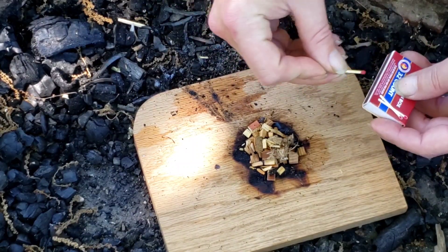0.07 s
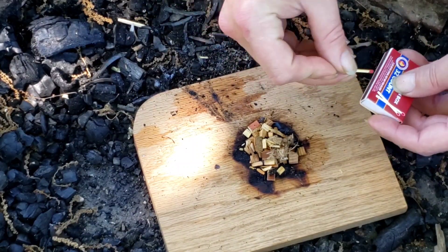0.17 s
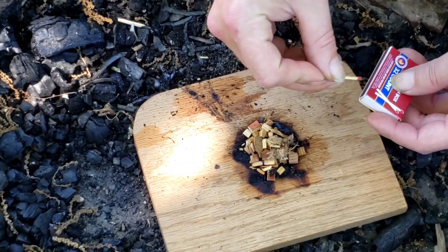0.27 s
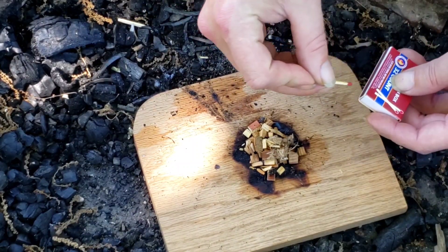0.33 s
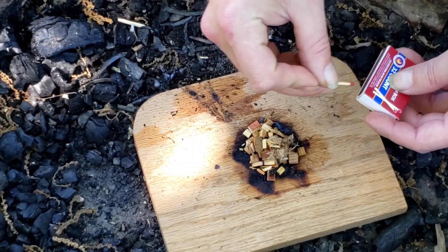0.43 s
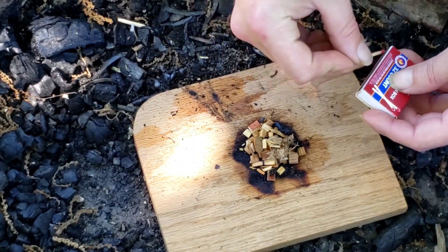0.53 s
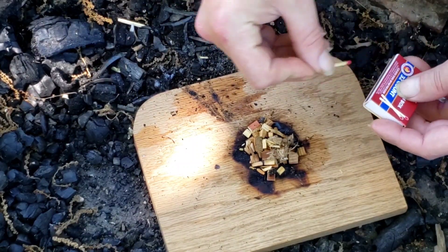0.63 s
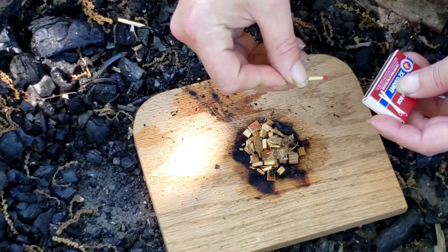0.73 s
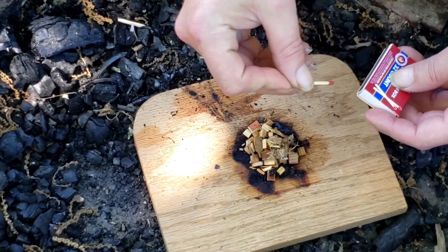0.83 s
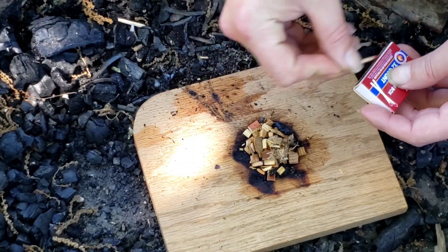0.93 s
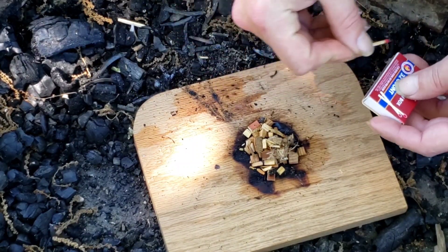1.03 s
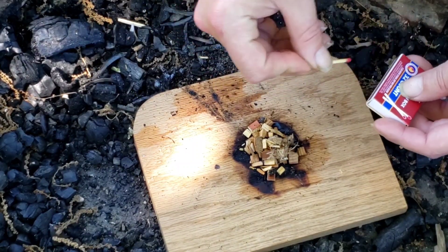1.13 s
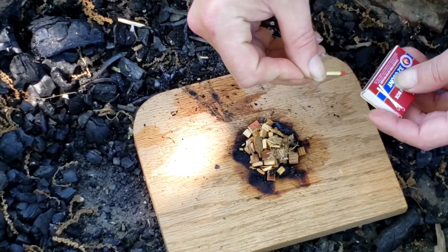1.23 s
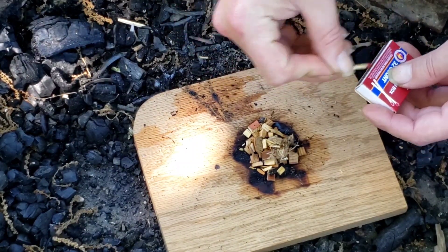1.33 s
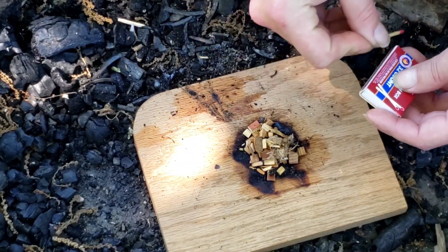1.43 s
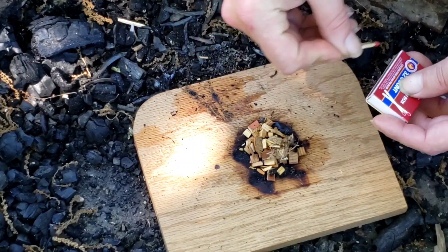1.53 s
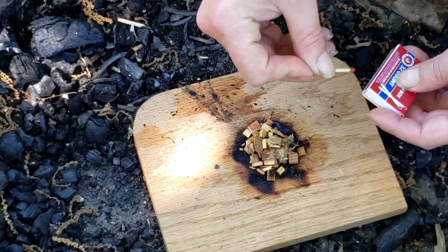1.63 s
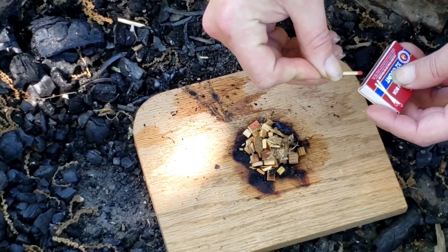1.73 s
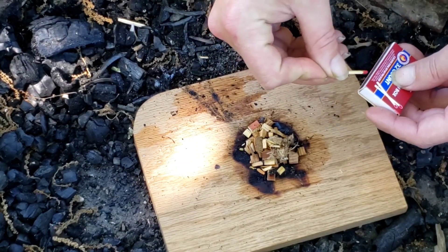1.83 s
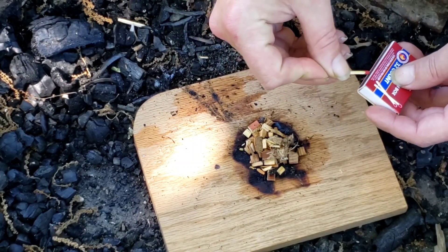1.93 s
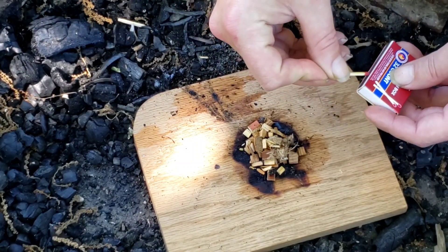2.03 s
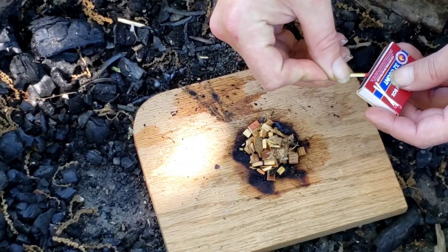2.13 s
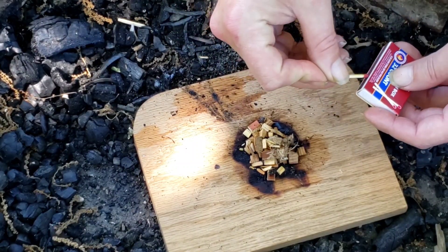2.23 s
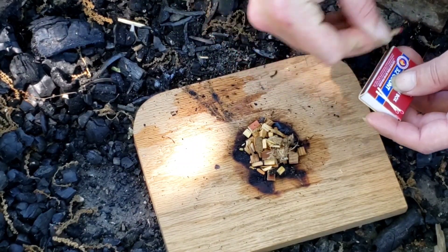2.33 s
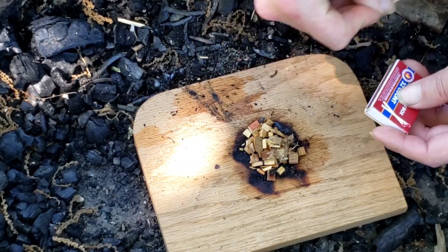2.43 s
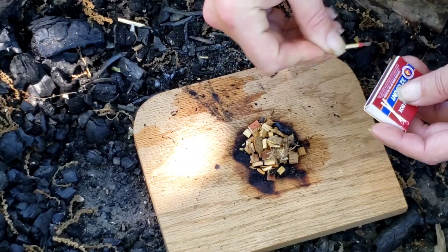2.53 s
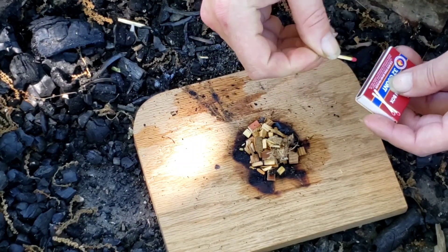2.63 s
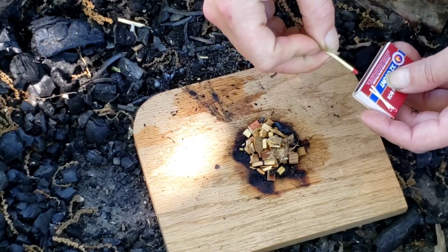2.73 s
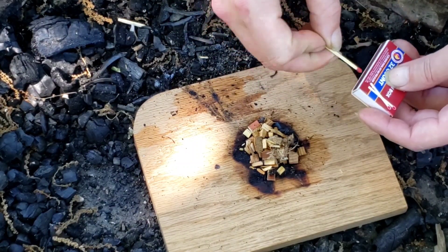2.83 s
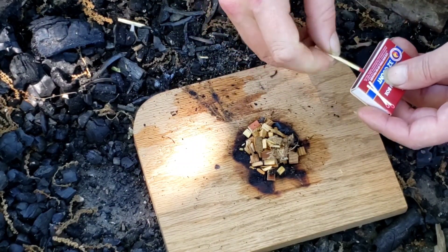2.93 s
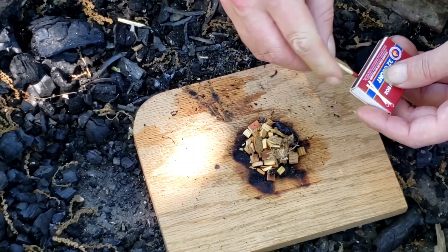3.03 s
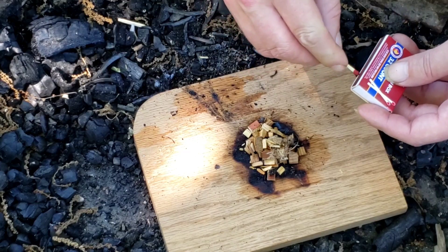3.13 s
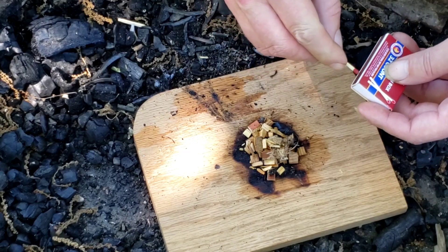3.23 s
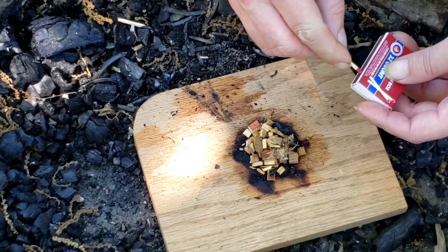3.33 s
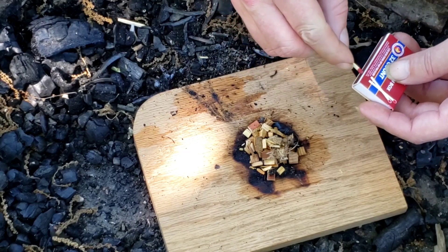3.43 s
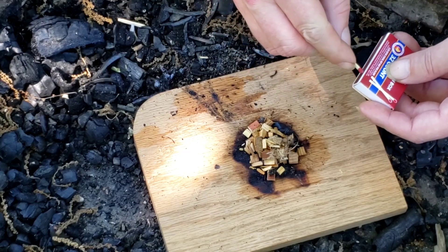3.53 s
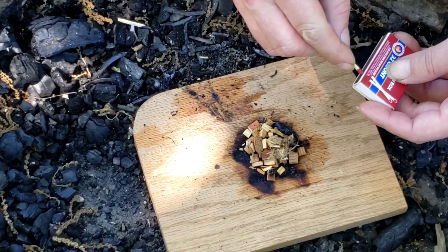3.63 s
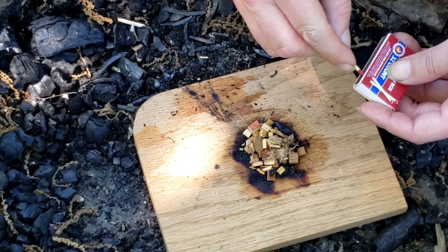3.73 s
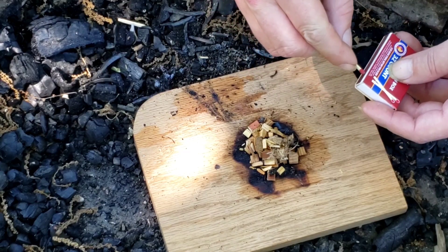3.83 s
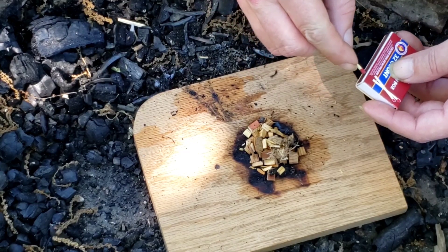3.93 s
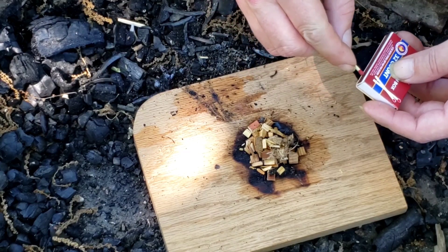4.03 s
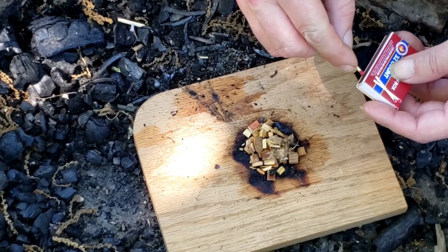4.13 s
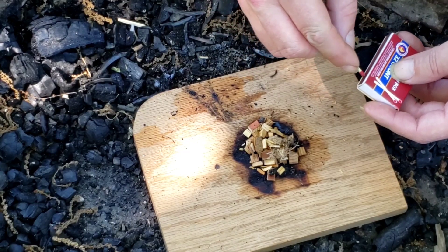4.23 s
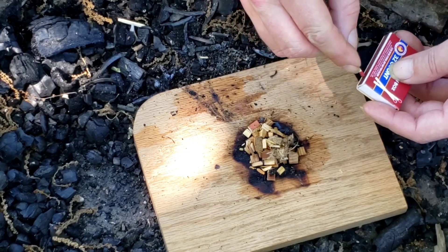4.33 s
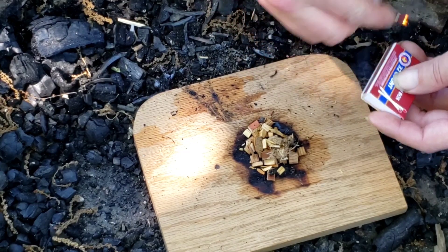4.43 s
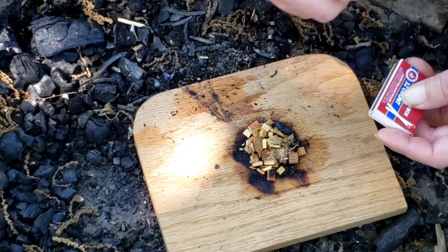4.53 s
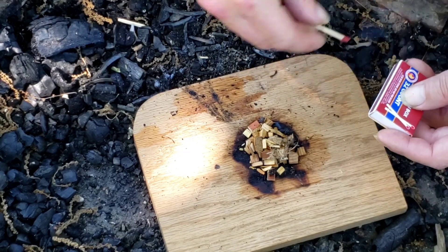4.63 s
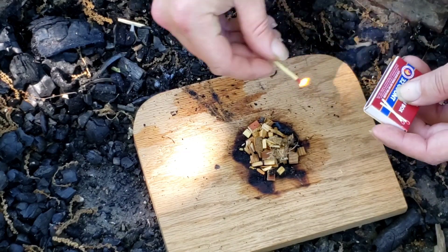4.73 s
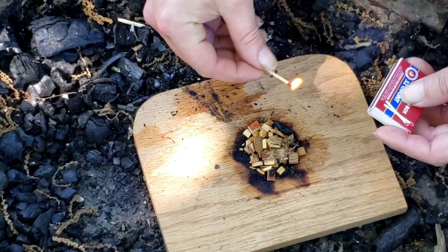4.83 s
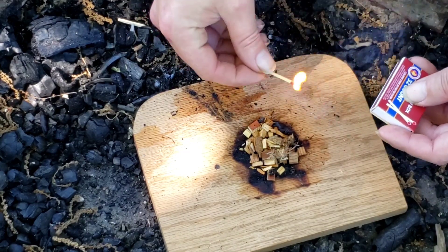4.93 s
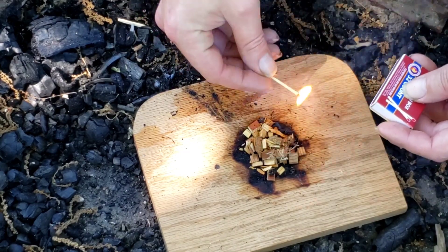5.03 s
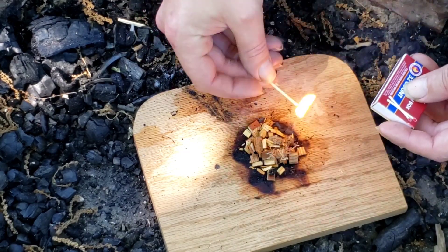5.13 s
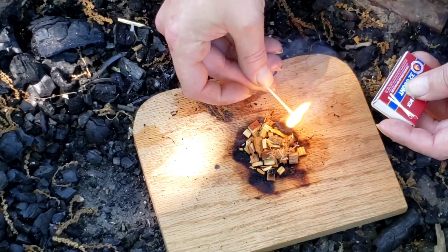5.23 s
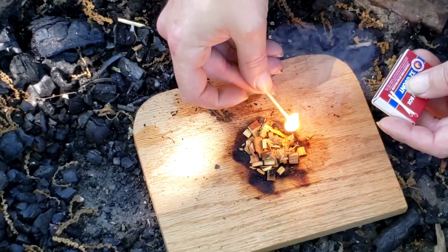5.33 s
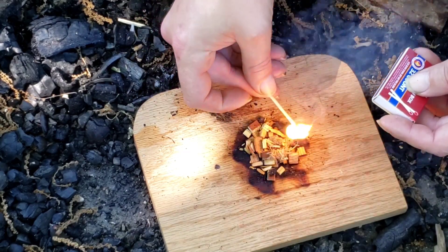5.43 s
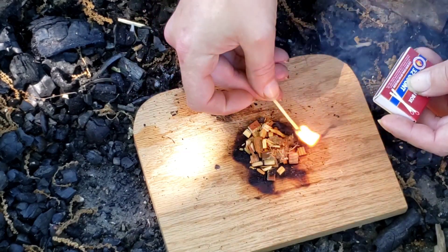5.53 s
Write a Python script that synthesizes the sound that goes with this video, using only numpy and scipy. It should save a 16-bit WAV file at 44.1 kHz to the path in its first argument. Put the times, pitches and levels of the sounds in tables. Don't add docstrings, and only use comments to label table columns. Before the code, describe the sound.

Four light scratchy match drags on a cardboard box, then one hard rasping strike and a thin fizzing flare, with birds and a distant engine idle.

```python
import sys
import numpy as np
from scipy import signal
from scipy.fft import rfft, irfft, next_fast_len
from scipy.io import wavfile
from scipy.ndimage import uniform_filter1d, map_coordinates

SR = 44100
rng = np.random.default_rng(int(sys.argv[2]) if len(sys.argv) > 2 else 0)


def level_to_linear(level):
    exponent = np.asarray(level, float) / 20
    return 10 ** exponent


def pcm_store(signal):
    levels = np.round(np.clip(np.atleast_2d(signal), -1, 1) * 32767)
    wavfile.write(sys.argv[1], SR, levels.astype(np.int16).T)


N = 245985
T = np.arange(N) / SR
SIDES = np.array([[.5], [-.5]])

# (head touches [s], rests [s], drags [s], pressure as the drag starts [dB], as it ends [dB])
STROKES = [
    (0.577, 0.001, 0.068, -39, -47),
    (1.024, 0.002, 0.043, -39.5, -40),
    (1.4437, 0.0016, 0.046, -40.5, -40),
    (2.378, 0.011, 0.036, -39.5, -39),
    (4.487, 0.0048, 0.029, -29.5, -31),
]
# (treble tilt [dB/octave], left board echo [ms], right [ms], echo share [ratio],
# left minus right [dB])
POSES = [(1, 0.448, 0.438, 0.29, .5), (1, 0.455, 0.433, 0.38, 0.5), (3, 0.418, 0.403, 0.38, 0),
         (0.5, 0.474, 0.5, 0.23, 0.5), (0, 0.223, 0.295, 0.21, -0.5)]
# (time [s], peak [dB])
SLIPS = [(0.5819, -58), (0.5912, -36.5), (0.5969, -29.5), (1.034, -49), (1.0492, -45), (1.4704, -39),
         (2.3931, -48), (2.407, -38), (2.4222, -32), (2.4249, -30), (4.49, -36), (4.4963, -16),
         (4.4983, -21), (4.5012, -18.5), (4.5045, -22), (4.5071, -19), (4.5143, -21), (4.5199, -19.5),
         (4.5335, -34)]
# (frequency [Hz], density [dB per Hz])
LIGHT_COLOUR = [(400.0, -16.5), (600.0, -22.5), (1100.0, -6), (1400.0, -4), (2000.0, -1.5), (2900.0, -1.5),
                (4300.0, -4), (5800.0, -11), (7500.0, -5), (9200.0, -14.5), (10500.0, -9), (12000.0, 0.5),
                (14500.0, -4), (15700.0, -4.5)]
# (frequency [Hz], density [dB per Hz])
HARD_COLOUR = [(150.0, -13), (350.0, -10.5), (600.0, -17), (900.0, -8.5), (1300.0, -9.5), (1800.0, -1),
               (2600.0, -6.5), (4000.0, -8), (6000.0, -11), (7500.0, -10), (9000.0, -16), (10500.0, -11),
               (12500.0, 1.5), (15500.0, -7.5)]
# (frequency [Hz], width [Hz])
BOX_MODES = [(800, 125), (1800, 190), (2300, 113), (3750, 350), (5000, 1050), (8200, 470)]
GRIP = [(7, 1, 10, 7.5, 7, -6), (-19, 4, 9.5, 10.5, 8.5, -7), (7, 10, 6.3, 13, 10, 2),
        (1, 12, 3.8, 0, 3, -22)]
# (time [s], length [s], level [dB], treble tilt [dB/octave])
BRUSHES = [
    (0.745, 0.02, -69, -5),
    (2.816, .06, -76, 9),
    (2.968, 0.096, -79.5, -3),
    (3.002, .01, -79, -4),
    (3.038, 0.042, -67.5, -2),
    (3.684, 0.011, -92, 6),
    (4.782, 0.016, -61, -9),
]
# (time [s], peak [dB])
KNOCKS = [
    (2.379, -50.5),
    (2.385, -47),
]
# (frequency [Hz], density [dB per Hz])
FLARE_COLOUR = [(300, -3.5), (600, -14), (1200, -24.5), (2000, -29), (3000, -23.5), (5000, -14),
                (7000, -17.5), (8300, -8), (9200, -27), (10500, -23.5), (12400, -1.5), (14000, -17),
                (15700, -15)]
# (time [s], peak [dB])
SPITS = [(5.0494, -74), (5.1094, -68), (5.1612, -52), (5.1654, -58), (5.1961, -47), (5.2335, -50),
         (5.2944, -60), (5.3023, -60), (5.3023, -49), (5.3258, -53), (5.3514, -57), (5.3564, -53),
         (5.3936, -36.5), (5.4054, -49), (5.4884, -64), (5.4994, -60), (5.523, -47.5), (5.5518, -55),
         (5.5574, -76)]
# (time [s], lag [ms])
FLAME_HEIGHT = [(4.55, .33), (4.68, .31), (4.86, 0.27), (5.1, 0.29), (5.35, 0.265), (5.45, 0.299),
                (5.58, .29)]
# (frequency [Hz], density [dB per Hz])
LENS_COLOUR = [(350, -15.5), (600, -10.5), (927, -25), (990, -9), (1070, -11), (1920, 1), (2560, -5.5),
               (2940, -20.5), (3400, -19), (4420, -26), (7480, -120)]
# (time [s], length [s], start [Hz], end [Hz], level [dB])
WHISTLER = [(0.008, 0.027, 4080, 4100, -60.5), (.046, .018, 4130, 3990, -61.5),
            (.075, 0.024, 4050, 4000, -68), (.21, .04, 3790, 3430, -75), (.365, .03, 3350, 3700, -71),
            (.465, 0.047, 3630, 3810, -67), (.515, .06, 3700, 3905, -67.5),
            (.655, 0.078, 3945, 3917, -57.5), (.742, .045, 3940, 3955, -70)]
# (time [s], length [s], start [Hz], end [Hz], level [dB])
WARBLER = [(.046, .018, 4050, 3600, -61.5), (.09, 0.048, 3480, 4350, -67), (.14, .05, 4450, 4650, -72.5),
           (.32, 0.022, 3190, 2970, -77), (.393, 0.034, 3900, 2530, -64.5), (.43, .012, 2540, 3000, -68),
           (.442, 0.037, 3000, 2680, -58.5), (1.11, .012, 3500, 3150, -65), (1.122, 0.023, 3150, 2250, -62),
           (1.14, 0.044, 2213, 2120, -69.5), (1.18, .012, 2180, 2750, -66),
           (1.192, .033, 2810, 2686, -58.5), (1.225, .012, 2755, 3400, -61.5),
           (2.22, 0.076, 2580, 3480, -75), (2.29, .012, 3380, 2980, -70), (2.302, .063, 2990, 2210, -70),
           (2.43, .04, 2450, 2600, -68), (2.47, .03, 2597, 3380, -67.5), (2.5, .025, 3350, 3380, -76),
           (5.1, .12, 2470, 2625, -75.5), (5.22, 0.045, 2660, 2600, -72.5), (5.27, .02, 2600, 2320, -68),
           (5.52, .07, 2300, 2520, -71.5)]
# (time [s], length [s], start [Hz], end [Hz], level [dB])
PEEPS = [(.05, 0.22, 4000, 4180, -70), (.36, 0.084, 3600, 4570, -74), (0.75, 0.16, 6700, 6560, -77),
         (0.932, 0.049, 6300, 4900, -77), (1.15, 0.16, 7430, 7600, -77), (1.308, 0.16, 8650, 8600, -78),
         (1.993, 0.093, 6880, 6770, -72), (1.997, 0.095, 5900, 6000, -73), (3.04, .06, 2310, 2360, -73)]
# (multiple of the firing rate [1], level [dB])
IDLE = [(1, -34), (2, 0.5), (3, -16.5), (4, -10.5), (5, -3), (6, -13), (7, -12), (8, -23), (9, -22.5),
        (10, -19), (11, -25), (12, -33.5)]
# (frequency [Hz], width [Hz], level [dB])
DRONES = [(97.86, 7.4, -61.5), (88.96, 6.8, -66.5), (111.6, 3.8, -68.5)]
# (frequency [Hz], density [dB per Hz])
AIR_COLOUR = [(12, -25), (20, -15), (54, 6), (107, -8), (162, -8), (240, -13.5), (295, -16.5), (356, -22),
              (510, -31.5), (1200, -38.5), (1560, -78.5), (2640, -120)]
# (time [s], depth [dB])
LULLS = [(.23, -8), (.6, -3), (1.98, -6), (2.79, -7), (3.04, -6), (3.65, -3), (4.12, -5)]
# (frequency [Hz], density [dB per Hz])
HISS_LEFT = [(400, -5.5), (700, -11.5), (1400, -6), (2100, -12.5), (2550, -5), (2950, -16), (3900, -6),
             (4500, -13), (5500, -22), (7500, -25.5), (8800, -31), (11000, -20.5), (14000, -25.5),
             (15700, -13)]
# (frequency [Hz], density [dB per Hz])
HISS_RIGHT = [(400, -3.5), (700, -14.5), (1500, -14.5), (3000, -16.5), (5000, -22), (7500, -25),
              (8800, -23), (11000, -21.5), (14000, -14.5), (15700, -25)]
# (frequency [Hz], left minus right [dB], left leads [rad])
PORTS = [
    [(400.0, 2.7, -0.9), (600.0, 2.0, -0.9), (1100.0, 2.7, -0.8), (1400.0, 3.6, -0.7), (2000.0, 3.3, -1.6),
     (2900.0, -1.0, -1.3), (4300.0, -0.5, -1.9), (5800.0, -1.6, -2.2), (7500.0, -3.1, -1.7),
     (9200.0, -0.6, -2.1), (10500.0, -0.3, -2.0), (12000.0, -2.5, -2.3), (14500.0, -0.7, -2.2),
     (15700.0, -1.3, -2.2)],
    [(150.0, 3.9, -0.5), (350.0, 1.5, -0.2), (600.0, 2.8, -0.1), (900.0, 5.1, -0.1), (1300.0, 3.8, -0.2),
     (1800.0, 7.5, -1.0), (2600.0, 9.0, -1.7), (4000.0, -5.4, -1.9), (6000.0, -11.5, -1.9),
     (7500.0, -7.6, -1.8), (9000.0, -1.1, -2.2), (10500.0, -5.7, -2.0), (12500.0, -8.4, -2.3),
     (15500.0, 1.0, -2.4)],
]

BITE_S, REST_DB = .002, -13
LIFT_S, LIFT_DB, JUDDER_DB = .012, -16.5, 0.84
SINK_PER_S = 2
KNOCK_HZ, KNOCK_WIDTH_HZ = 960, 370
IGNITES_S, CATCH_S, SPARK_DB, BLAZE_DB = 4.58, 0.25, -70.5, -64
GROUND_LAG, SWAY_MS, SWAY_PER_S = 4.3, .15, 4
LENS_S, LENS_KICK_S, LENS_RUN_S = 4.275, 0.034, 0.14
LENS_KICK_DB, LENS_DB = -67.5, -65
SLUR_EDGE_S, WHISTLER_PAN_DB, WARBLER_PAN_DB = 0.0056, 0.5, 2.5
FLUTTER_DB, WAVER = 2.5, .007
BUZZ = 0.14
TREES_T60_S, TREES_DB = .3, -9
IDLE_HZ = 28.48
LULL_S, NEARING_DB_S = .045, .3


def strokes():
    out, rub = np.zeros((2, N)), grit(0.99, 2.8)
    cracks = bursts(SLIPS, 0.0015) * level_to_linear(-2.3) * np.sign(rub)
    judder = level_to_linear(JUDDER_DB * walk(120))
    for k, (stroke, pose) in enumerate(zip(STROKES, POSES)):
        tilt_db, left_ms, right_ms, share, pan_db = pose
        i = slice(int((stroke[0] - .02) * SR), int((stroke[0] + .13) * SR))
        shake = (rub * judder * pressure(*stroke))[i]
        crack = cracks[i]
        hard = k == len(GRIP)
        if hard:
            heard = colour(shake + crack, HARD_COLOUR, tilt_db=tilt_db)
        else:
            drive = shake + 0.47 * crack
            body = sum(level_to_linear(db) * ring(drive, *mode) for mode, db in zip(BOX_MODES, GRIP[k]))
            heard = colour(0.63 * shake + 0.63 * crack + body, LIGHT_COLOUR, tilt_db=tilt_db)
        at = np.arange(len(shake))
        sink = 1 - SINK_PER_S * (T[i] - stroke[0] - stroke[2] / 2)
        pair = [direct + share * map_coordinates(direct, [at - ms * sink * SR / 1000])
                for direct, ms in zip(heard, (left_ms, right_ms))]
        ports = turn(np.array(pair), PORTS[int(hard)]) * level_to_linear(SIDES * pan_db)
        out[:, i] += ports * np.std(shake + crack) / np.std(ports)
    return echoes(out, 0.32, -21, 0.0035)


def pressure(s, rest, drag, start_db, end_db):
    times = s + np.cumsum([0, BITE_S, rest, BITE_S, drag, LIFT_S, LIFT_S]) - BITE_S
    touch_db = [start_db + 4 * REST_DB, start_db + REST_DB, start_db + REST_DB]
    lift_db = [end_db + LIFT_DB, end_db + 4 * LIFT_DB]
    return curve(np.transpose([times, touch_db + [start_db, end_db] + lift_db]))


def grit(spread_db, patch_db):
    size_db = spread_db * rng.exponential(size=N) + patch_db * walk(500)
    return level(rng.standard_normal(N) * level_to_linear(size_db), 0)


def flare():
    board_ms = np.interp(T, *np.transpose(FLAME_HEIGHT))
    ground_ms = GROUND_LAG * board_ms + SWAY_MS * walk(SWAY_PER_S)
    blaze = curve([(IGNITES_S, SPARK_DB), (IGNITES_S + CATCH_S, BLAZE_DB), (N / SR, BLAZE_DB)])
    flutter = level_to_linear(0.5 * walk(21.0))
    jet = level(colour(grit(1.35, 1.7) * flutter, FLARE_COLOUR)[0], 1.5) * blaze
    board, ground = (np.arange(N) - ms * SR / 1000 for ms in (board_ms, ground_ms))
    right = jet + 0.59 * map_coordinates(jet, [board]) + 0.46 * map_coordinates(jet, [ground])
    left = jet + 0.3 * map_coordinates(jet, [board - 5.]) + 0.14 * map_coordinates(jet, [ground + 17.0])
    left = delay(left, 8.6)
    pops = delay(bursts(SPITS, .00002), 21.8)
    spit = 30 * ring(pops, 10700, 273) + 1.3 * ring(pops, 16000, 4500)
    return np.array([level_to_linear(-13.0) * left + level_to_linear(-8) * delay(spit, 2.9), right + spit])


def ticks():
    out, rub = np.zeros((2, N)), grit(2.2, 0.89)
    for s, length, db, tilt_db in BRUSHES:
        i, n = int(s * SR), int(length * SR)
        brush = level(colour(rub[i:i + n], LIGHT_COLOUR, tilt_db=tilt_db), db)
        out[:, i:i + n] += brush * np.hanning(n)
    knock = 5 * ring(rub * bursts(KNOCKS, 0.011), KNOCK_HZ, KNOCK_WIDTH_HZ)
    return out * level_to_linear(SIDES * -3) + knock


def lens():
    run = curve([(LENS_S, -100), (LENS_S + LENS_KICK_S, LENS_KICK_DB),
                 (LENS_S + LENS_RUN_S, LENS_DB), (N / SR, LENS_DB)])
    rough = rng.standard_normal(N) * level_to_linear(0.99 * walk(40))
    whir = level(colour(rough, LENS_COLOUR)[0], 3.3) * run * level_to_linear(0.8 * walk(2.7))
    return whir * level_to_linear(np.array([[0], [-24]]))


def birds():
    out = song(WHISTLER, WHISTLER_PAN_DB) + song(WARBLER, WARBLER_PAN_DB)
    for s, length, start_hz, end_hz, db in PEEPS:
        along = np.clip((T - s) / length, 0, 1)
        pitch = start_hz + (end_hz - start_hz) * along
        buzz = walk(BUZZ * start_hz) * np.sin(2 * np.pi * np.cumsum(pitch) / SR)
        out += level_to_linear(db) * np.sin(np.pi * along) * buzz
    return echoes(turn(out, PORTS[0], lean=0), TREES_T60_S, TREES_DB, 0.0087)


def song(slurs, pan_db):
    s, length, start_hz, end_hz, db = np.transpose(slurs)
    times = np.maximum.accumulate(np.transpose([s, s + length]).ravel())
    glide = np.interp(T, times, np.transpose([start_hz, end_hz]).ravel())
    pitch = uniform_filter1d(glide, size=300) * (1 + WAVER * walk(60))
    swell = np.zeros(N)
    for start, n, d in zip(s, length, db):
        to_edge = np.minimum(T - start, start + n - T)
        swell += level_to_linear(d) * np.clip(to_edge / SLUR_EDGE_S + .5, 0, 1)
    loudness = swell * level_to_linear(FLUTTER_DB * walk(70) + SIDES * pan_db)
    return np.sqrt(2) * loudness * np.sin(2 * np.pi * np.cumsum(pitch) / SR)


def engines():
    phase = 2 * np.pi * np.cumsum(IDLE_HZ * (1 + 0.00385 * walk(1.488))) / SR
    idle = sum(level_to_linear(db + 2.12 * walk(5)) * np.sin(k * phase + 2 * np.pi * rng.random()) for k, db in IDLE)
    drone = sum(level(ring(ring(rng.standard_normal(N), hz, w), hz, w), db) for hz, w, db in DRONES)
    mid, side = rng.standard_normal((2, N))
    air = level(colour(mid + 0.71 * SIDES * side, AIR_COLOUR), -60)
    lull_db = sum(db * np.exp(-((T - s) / LULL_S) ** 2) for s, db in LULLS)
    return level_to_linear(NEARING_DB_S * T + lull_db) * (level(idle, -57) + drone + air)


def hiss():
    left, right = rng.standard_normal((2, N)) * level_to_linear(.5 * walk(2.87))
    return np.array([level(colour(left, HISS_LEFT)[0], -69), level(colour(right, HISS_RIGHT)[0], -75.0)])


def echoes(x, t60, wet_db, start_s):
    s = np.arange(SR) / SR
    tail = rng.standard_normal((2, SR)) * level_to_linear(-60 * s / t60) * (1 - np.exp(-s / start_s))
    return x + signal.fftconvolve(x, level(tail, wet_db) / np.sqrt(SR), axes=1)[:, :N]


def turn(pair, table, lean=1):
    n = next_fast_len(pair.shape[1])
    hz = np.arange(n // 2 + 1) * SR / n
    gain = level_to_linear(lean * SIDES * shape(table, hz))
    lead = np.exp(1j * SIDES * shape(table, hz, axis=2))
    return irfft(rfft(pair, n) * gain * lead, n)[:, :pair.shape[1]]


def level(x, db):
    return x * level_to_linear(db) / np.sqrt(np.mean(x ** 2))


def shape(table, hz, axis=1):
    columns = np.transpose(table)
    return np.interp(np.log(hz + 1), np.log(columns[0] + 1), columns[axis])


def colour(x, table, tilt_db=0., size=4096):
    hz = np.arange(size // 2 + 1) * SR / size
    db = np.tile(shape(table, hz) + tilt_db * np.log2(hz / 3000 + 0.039), (2, 1))
    cep = irfft(db * np.log(10) / 20)
    cep[:, 1:size // 2] *= 2
    cep[:, size // 2 + 1:] = 0
    response = irfft(np.exp(rfft(cep)))
    return signal.fftconvolve(x * np.ones((2, 1)), response, axes=1)[:, :np.shape(x)[-1]]


def ring(x, hz, width):
    return signal.lfilter(*signal.iirpeak(hz, hz / width, fs=SR), x)


def walk(rate):
    k = int(SR / rate)
    held = np.repeat(rng.standard_normal(N // k + 1), k)
    return 1.34 * uniform_filter1d(uniform_filter1d(held, k), k)[:N]


def curve(table, off_db=-130.):
    s, db = np.transpose(table)[:2]
    return level_to_linear(np.interp(T, s, db, left=off_db, right=off_db))


def bursts(events, fall_s):
    s, db = np.transpose(events)
    kick = np.zeros(N)
    kick[(s * SR).astype(int)] = level_to_linear(db)
    return signal.lfilter([1], [1, -np.exp(-1 / (fall_s * SR))], kick)


def delay(x, samples):
    n = next_fast_len(len(x))
    lag = np.exp(-2j * np.pi * np.arange(n // 2 + 1) * samples / n)
    return irfft(rfft(x, n) * lag, n)[:len(x)]


def scene():
    return strokes() + flare() + ticks() + lens() + birds() + engines() + hiss()


def roll_off(x):
    return signal.sosfilt(signal.butter(12, 16390, fs=SR, output="sos"), x)


def record(dry):
    low_cut = signal.butter(N=2, Wn=34, btype="high", fs=SR, output="sos")
    top_cut = signal.ellip(10, .2, 85, 15550, fs=SR, output="sos")
    mix = signal.sosfilt(top_cut, signal.sosfilt(low_cut, dry))
    return roll_off(mix)


dry = scene()
out = record(dry)
pcm_store(out)
```